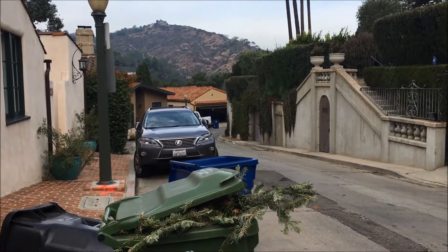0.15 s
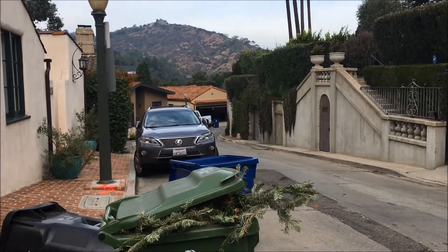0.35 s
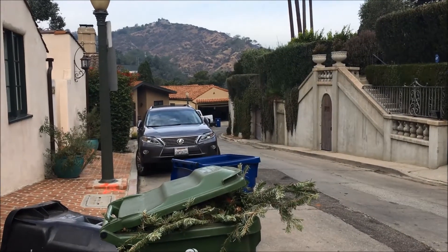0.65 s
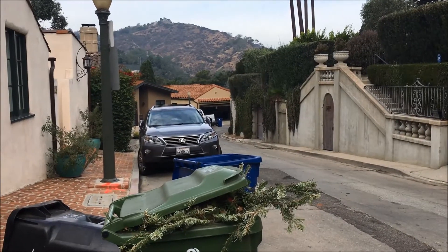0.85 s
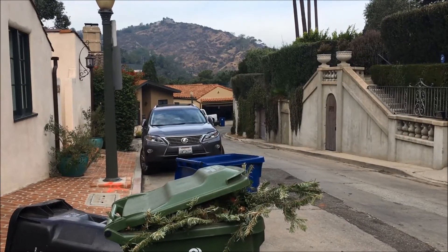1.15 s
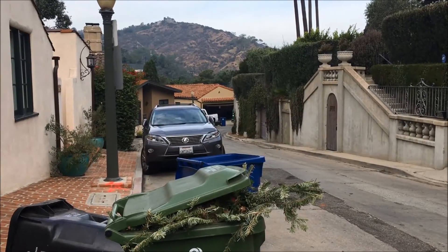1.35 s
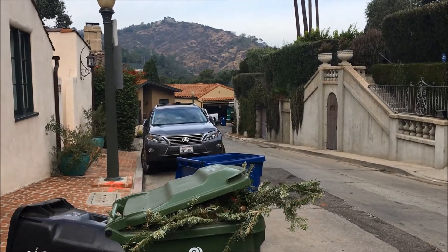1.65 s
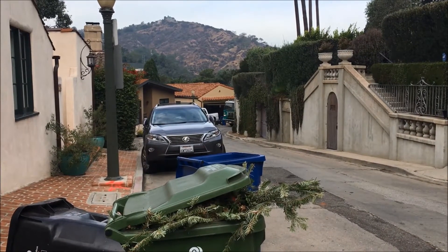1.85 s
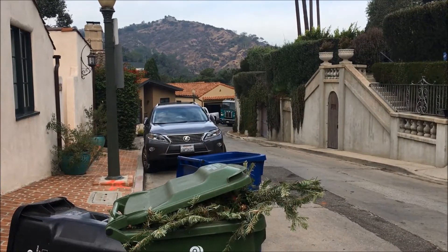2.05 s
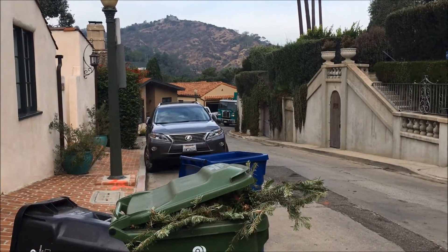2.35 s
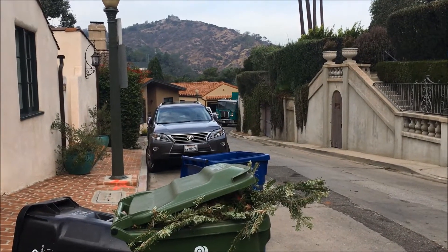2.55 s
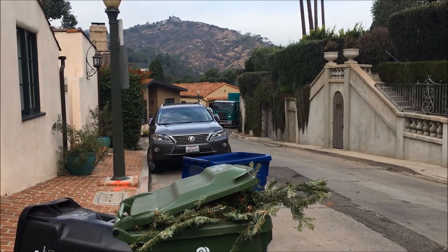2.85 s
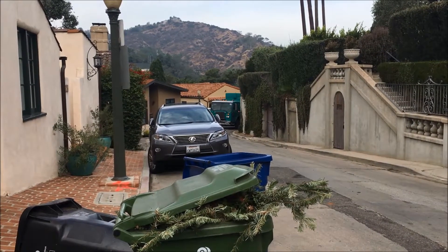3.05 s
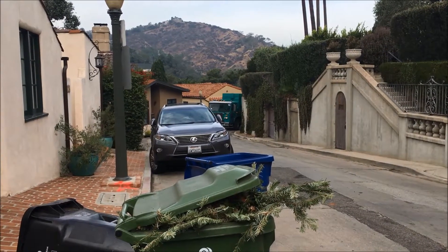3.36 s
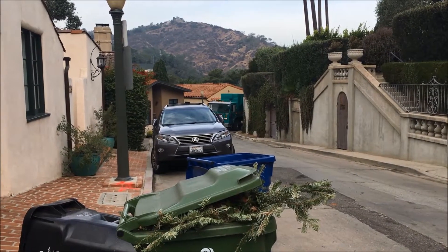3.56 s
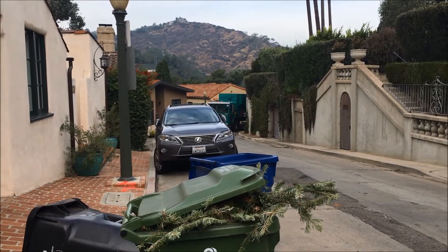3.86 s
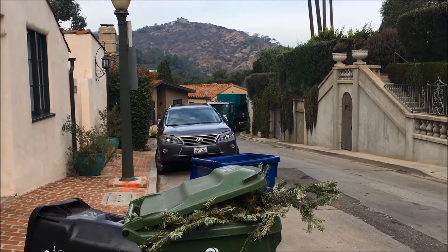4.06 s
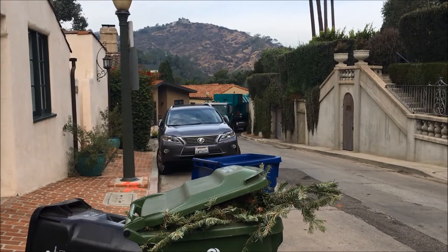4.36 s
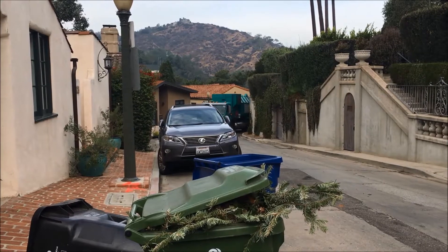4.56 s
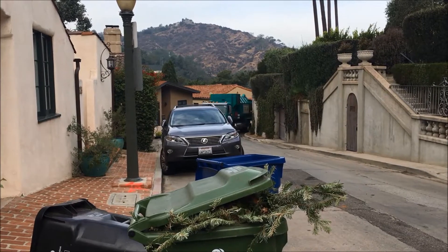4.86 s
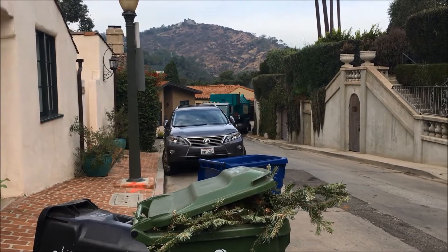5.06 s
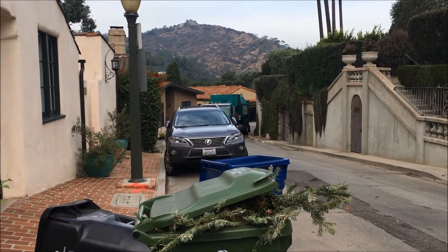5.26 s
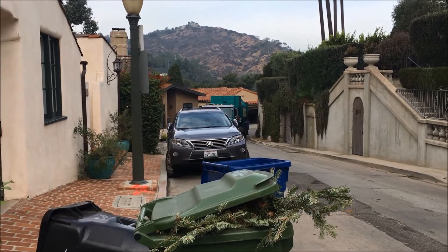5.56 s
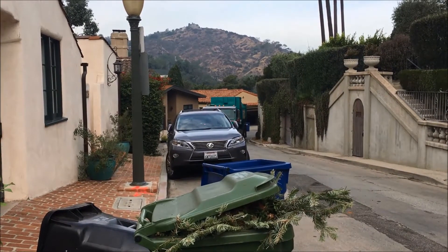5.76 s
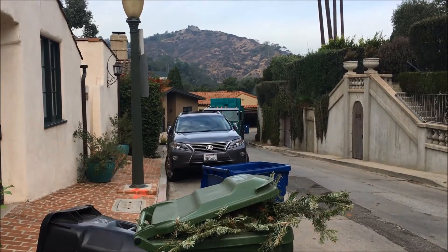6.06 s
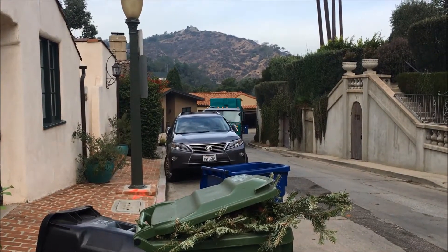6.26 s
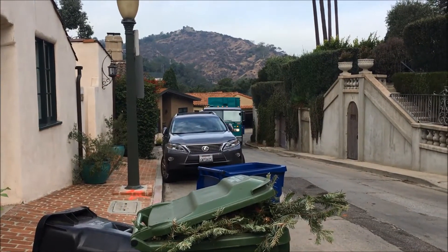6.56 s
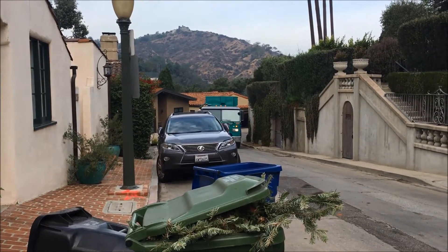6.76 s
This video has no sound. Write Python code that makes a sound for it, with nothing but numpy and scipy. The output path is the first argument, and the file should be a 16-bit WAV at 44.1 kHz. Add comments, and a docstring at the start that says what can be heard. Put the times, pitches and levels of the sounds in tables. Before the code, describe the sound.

Outdoors on a narrow street, a stationary handheld microphone hears a distant heavy truck coming closer. The deep exhaust note swells and fades with wall echoes over soft rumble and whines. Past the middle the engine revs up under load, begins as a rough fast flutter that slows to a heavy throb, and adds thin turbo whistle, drive-line whine, clatter and airy hiss. It ends loud, still approaching.

```python
"""The exhaust of a six-cylinder refuse truck booms at the firing rate and throbs under load, as the truck
speeds up toward the microphone along a walled street. Crank-locked sines make pump, fan, gear and order tones;
free sines make hum, turbo and drive-line whine. Shaped noise makes growl, rattle and a roar that grows louder
and brighter. Two thin squeaks come early, one faint puff of air later."""
import sys
import numpy as np
from scipy import signal
from scipy.fft import rfft, irfft, next_fast_len
from scipy.io import wavfile
from scipy.ndimage import uniform_filter1d, map_coordinates

SR = 44100
rng = np.random.default_rng(int(sys.argv[2]) if len(sys.argv) > 2 else 0)


def file_out(sig):
    """Save sig as 16-bit WAV at sys.argv[1]."""
    # one column per channel
    cols = np.atleast_2d(sig).T
    # limit, then scale
    lim = np.clip(cols, -1, 1)
    pcm = np.round(lim * 32767).astype(np.int16)
    wavfile.write(sys.argv[1], SR, pcm)


N = 304290
TIME_S = np.arange(N) / SR


def amp(db):
    """Gain of a level in dB."""
    return 10 ** (np.asarray(db) / 20)


def unit(x):
    """x scaled to rms 1."""
    return x / np.sqrt(np.mean(x ** 2) + 1e-20)


def curves(rows):
    """One value per sample for each column after the time."""
    knots_s, *columns = np.transpose(rows)
    return [np.interp(TIME_S, knots_s, column) for column in columns]


def wobble(knots_per_s):
    """Smooth random curve through normally distributed knots."""
    knots = rng.standard_normal(int(N * knots_per_s / SR) + 4)
    return map_coordinates(knots, [np.arange(N) * knots_per_s / SR])


def filtered(x, response):
    """x times a response of frequency, N samples long."""
    size = next_fast_len(N + 8192)
    spectrum = rfft(x, size) * response(np.fft.rfftfreq(size, 1 / SR))
    return irfft(spectrum, size)[..., :N]


def coloured(x, spectrum):
    """x shaped by a spectrum, interpolated over log frequency; rms 1."""
    knots_hz, db = np.transpose(spectrum)

    def response(hz):
        return amp(np.interp(np.log(hz + 1), np.log(knots_hz + 1), db, left=-120, right=-120))
    return unit(filtered(x, response))


def rush(spectrum, patchy_db):
    """Coloured noise of rms 1 with time-frequency patches of random gain."""
    bins = signal.stft(rng.standard_normal(N + 512), nperseg=512)[2]
    patches = uniform_filter1d(rng.standard_normal(bins.shape), size=5, axis=0)
    patches = uniform_filter1d(patches, size=16, axis=1)
    noise = signal.istft(bins * amp(patchy_db * unit(patches)), nperseg=512)[1][:N]
    return coloured(noise, spectrum)


def tone(turns, flutter_db, drift_turns, knots_per_s):
    """Sine on a running phase, about rms 1, unsteady in level and phase."""
    level = np.sqrt(2) * amp(flutter_db * wobble(knots_per_s))
    return level * np.sin(2 * np.pi * (turns + drift_turns * wobble(knots_per_s)))


def glide(rows, flutter_db, drift_turns, knots_per_s):
    """Whine with a pitch of its own, silent before its first row."""
    hz, db = curves(rows)
    started = TIME_S > rows[0][0]
    return started * amp(db) * tone(np.cumsum(hz) / SR, flutter_db, drift_turns, knots_per_s)


# engine speed: (time [s], firing rate [Hz])
SPEED = [(0, 59.02), (.8, 62.66), (1.5, 61.06), (1.9, 61.77), (2.8, 65.22), (3.4, 66.25), (4, 65.95),
         (4.2, 67.05), (4.4, 70.87), (4.7, 75.17), (5, 77.85), (5.3, 79.26), (5.6, 80.03), (6, 80.62),
         (6.9, 83.2)]


def crank():
    """Crank turns so far: three firings a turn."""
    return np.cumsum(curves(SPEED)[0]) / (3 * SR)


LOAD_START_S, LOAD_RISE_S = 4.344, 0.75


def load():
    """Engine load, rising from 0 to 1 as the driver opens the throttle."""
    return np.clip((TIME_S - LOAD_START_S) / LOAD_RISE_S, 0, 1)


# nearness of the truck: (time [s], level [dB])
NEAR = [(0, 1), (.3, -0.1), (1.7, 0.1), (3.4, 5.5), (4.4, 6.5), (4.6, 8), (5.7, 9.5), (6.3, 11),
        (6.9, 13.5)]


def nearing(far_db, db_per_near_db):
    """Gain of a layer that grows as the truck nears."""
    return amp(far_db + db_per_near_db * curves(NEAR)[0])


# exhaust boom, swelling and fading as wall echoes add or cancel: (time [s], level [dB])
BOOM = [(0, -28.5), (.65, -27.5), (.82, -37), (1.1, -33.5), (1.5, -25.5), (1.68, -30.5), (1.82, -26.5),
        (2.02, -32), (2.3, -26.5), (2.6, -32.5), (3, -24.5), (3.28, -32), (3.55, -22.5), (4.1, -21.5),
        (4.27, -23.5), (4.37, -30), (4.5, -22.5), (5.05, -15), (5.4, -17.5), (6, -14.5), (6.4, -19.5),
        (6.6, -17), (6.8, -19.5), (6.9, -19.5)]
# throb of the boom, mostly slowing as the drive takes hold: (time [s], throb rate [Hz])
THROB = [(4.4, 57.82), (4.7, 44.95), (5.15, 29.17), (5.5, 23.57), (6.05, 21.66), (6.4, 14.52), (6.6, 17.32),
         (6.9, 13.75)]
# side tones under the boom at full load; the lower one LOAD_RISE_S after the throb starts
SIDE_LOWER_DB, SIDE_UPPER_DB, SIDE_GROWS_DB_PER_S = -11.5, -14, 3
SIDE_LIGHT_DB = -15  # added to the side tones at zero load
SECOND_SIDES_DB = -10.5  # re the lower side tone; sharpens each throb


def exhaust():
    """Firing tone, its level rocked by the throb: side tones below and above."""
    since_s = TIME_S - THROB[0][0]
    started = since_s > 0
    throbs = np.cumsum(started * curves(THROB)[0]) / SR + .39
    throb_phase = 2 * np.pi * throbs
    firing = np.exp(2j * np.pi * (3 * crank() + 0.01 * wobble(8.2)))

    lower_gain = amp(SIDE_LOWER_DB + SIDE_GROWS_DB_PER_S * (since_s - LOAD_RISE_S))
    lower = lower_gain * np.exp(-1j * throb_phase)
    upper = amp(SIDE_UPPER_DB) * np.exp(1j * throb_phase)
    second = lower_gain * amp(SECOND_SIDES_DB) * np.cos(2 * throb_phase)
    sides = amp(SIDE_LIGHT_DB * (1 - load())) * (lower + upper + second)

    level = np.sqrt(2) * amp(curves(BOOM)[0] + 0.23 * wobble(6.4))
    return level * np.real(firing * (1 + started * sides))


# weaker crank orders: [cycles per crank turn]
ORDERS_WEAK = [1.5, 2, 2.5, 4, 4.5, 5, 6, 7.5, 9, 11, 15, 20, 30, 39, 42, 62, 65]
# their levels far off: (at light load [dB], at full load [dB])
ORDERS_DB = [(-57.5, -43.5), (-65, -51), (-49, -48), (-50.5, -53.5), (-51.5, -47.5), (-59.5, -53.5),
             (-51, -59), (-50.5, -56), (-62, -53), (-64, -58), (-58.5, -59), (-57.5, -59.5), (-62.5, -78),
             (-71, -68.5), (-67, -56.5), (-74, -69.5), (-70, -62)]
ORDERS_DB_PER_NEAR_DB = 0.44


def orders():
    """Uneven cylinders add faint tones that fade in and out; the load shifts their balance."""
    turns, full = crank(), load()
    out = np.zeros(N)
    for order, (light_db, full_db) in zip(ORDERS_WEAK, ORDERS_DB):
        far_db = light_db + (full_db - light_db) * full
        level = nearing(far_db, ORDERS_DB_PER_NEAR_DB) * amp(3 * wobble(1.2))
        out += level * tone(order * turns + rng.random(), flutter_db=3,
                            drift_turns=.04 + order / 500, knots_per_s=4 + order / 2)
    return out


# low roar: (time [s], level [dB])
LOW_ROAR = [(0, -48), (.4, -47), (1.3, -45), (1.65, -47.5), (2.6, -47), (3.6, -48.5), (4.6, -45.5),
            (5.5, -45.5), (6.2, -45.5), (6.45, -43), (6.9, -43.5)]


def low_roar_db():
    """Level shared by growl and rumble."""
    return curves(LOW_ROAR)[0]


# growl spectrum before scaling: (frequency [Hz], level [dB])
GROWL = [(90, -44.5), (150, -2), (300, -1.5), (440, -3), (520, -12.5), (700, -11.5), (1100, -15),
         (1400, -43)]


def growl():
    """Noise nearly repeating every four-stroke cycle: faint half-order lines, pattern slowly renewed."""
    steps = 512
    patterns = rng.standard_normal((24, steps))
    age = np.clip(2.212 * TIME_S, 0, len(patterns) - 1)  # patterns used so far
    angle = crank() / 2 % 1 * steps  # two crank turns a cycle
    cyclic = map_coordinates(patterns, [age, angle], order=1, mode="grid-wrap")
    return amp(low_roar_db() + 0.06) * coloured(cyclic, GROWL)


# whines on the shafts: (time [s], pump level [dB], fan level [dB])
WHINES = [(0, -41, -41), (.5, -42, -45), (1.2, -40, -43), (1.5, -39.5, -46), (2.1, -40, -42),
          (2.65, -35, -45), (3, -36, -50), (3.45, -41, -45), (4.15, -40.5, -53), (4.38, -50, -52),
          (4.65, -48, -46), (5.2, -53, -53), (5.6, -44.5, -53), (6.2, -45.5, -51), (6.9, -39, -43)]
# gear mesh whine: (time [s], level [dB])
MESH = [(0, -70), (2.1, -58), (3.7, -62), (4.02, -53), (4.14, -60), (4.25, -50), (4.37, -47), (4.43, -64),
        (4.6, -60), (4.66, -46), (4.82, -52), (4.93, -43), (5.15, -51), (5.42, -45), (5.72, -47),
        (5.78, -61), (6.9, -51)]


def whines():
    """Pump and belt-driven fan lie close together and beat; the gear mesh sings higher up."""
    turns = crank()
    pump_db, fan_db = curves(WHINES)
    pump = amp(pump_db) * tone(10 * turns, flutter_db=1.5, drift_turns=.02, knots_per_s=5)
    fan = amp(fan_db) * tone(10.285 * turns + .1, flutter_db=.8, drift_turns=.02, knots_per_s=5)
    mesh = amp(curves(MESH)[0]) * tone(68 * turns, flutter_db=2.2, drift_turns=.06, knots_per_s=40)
    return pump + fan + mesh


# engine block rattle: (time [s], lower band level [dB], upper band level [dB])
RATTLE = [(0, -64, -78), (2, -53.5, -69), (4.1, -50.5, -60), (4.6, -44, -52), (5.1, -51, -52),
          (5.8, -48.5, -58), (6.3, -46, -47), (6.9, -46.5, -41)]
# block modes, one list per band: (frequency [Hz], width [Hz])
BLOCK = [
    [(1065, 49), (1135, 73)],
    [(1710, 76), (1785, 51)],
]


def rattle():
    """Combustion noise rings the block's modes in uneven bursts."""
    out = np.zeros(N)
    for modes, db in zip(BLOCK, curves(RATTLE)):
        def ring(hz):
            resonances = sum(1j * hz * width / (centre ** 2 - hz ** 2 + 1j * hz * width)
                             for centre, width in modes)
            return resonances ** 2
        bursts = amp(2.2 * wobble(45)) * rng.standard_normal(N)
        out += amp(db) * unit(filtered(bursts, ring))
    return out


# deep rumble of road and chassis: (time [s], level [dB])
GROUND = [(0, -33.5), (1, -39.5), (3.7, -37), (4.3, -34.5), (4.6, -28.5), (5.2, -33), (6.9, -36)]
# roar spectra before scaling: (frequency [Hz], level [dB])
DEEP = [(15, -14), (30, -14.5), (50, 5.5), (100, 1), (140, -5), (180, -22.5), (260, -36)]
RUMBLE = [(100, -32.5), (170, 2), (240, 3), (320, 5), (450, 1), (550, -17), (800, -41)]
BODY = [(280, -18.5), (480, -3.5), (560, -4), (657, -2), (772, -5.5), (880, -1.5), (1070, -2), (1210, -4.5),
        (1360, -6.5), (1780, -3), (3000, -18), (3900, -28.5), (6600, -120)]
HISS = [(1410, -23), (2400, -6), (2940, -5), (3720, -2.5), (4890, -10.5), (6040, -7.5), (7940, -18),
        (9000, -16.5), (10500, -27), (12700, -29), (15600, -37)]


def roar():
    """Deep rumble, low roar, intake noise and hiss; the upper two pulse faintly with each firing."""
    pulse = 1 + 0.027 * np.cos(2 * np.pi * 3 * crank())
    surge = wobble(2.59)
    deep = amp(curves(GROUND)[0] + 1.3 * wobble(3.04)) * rush(DEEP, patchy_db=0.1)
    rumble = amp(low_roar_db() - 1 + 0.76 * wobble(3.8)) * rush(RUMBLE, patchy_db=2.0)
    body_level = nearing(far_db=-46.5, db_per_near_db=0.62) * amp(0.27 * surge)
    body = body_level * pulse * rush(BODY, patchy_db=1.0)
    hiss_level = nearing(far_db=-59.5, db_per_near_db=0.94) * amp(.2 * surge + 0.37 * wobble(3.968))
    hiss = hiss_level * pulse * rush(HISS, patchy_db=0.6)
    return deep + rumble + body + hiss


# faint early hum: (time [s], frequency [Hz], level [dB])
HUM = [(0, 680, -61), (.35, 688, -53.5), (.55, 693, -58), (.75, 700, -90)]


def hum():
    """Faint unsteady sine, rising slightly in pitch, that dies away."""
    return glide(HUM, flutter_db=2.5, drift_turns=.06, knots_per_s=12)


# squeaks: (start [s], length [s], first frequency [Hz], last frequency [Hz], level [dB])
SQUEAKS = [(.04, .11, 5430, 5450, -73), (.435, .115, 5170, 4990, -64)]
OCTAVE_DB = -15  # re the fundamental


def squeaks():
    """Short thin sliding notes, slightly rough in phase, with a weak octave."""
    out = np.zeros(N)
    rough = wobble(100)
    for start_s, length_s, first_hz, last_hz, db in SQUEAKS:
        start, length = int(start_s * SR), int(length_s * SR)
        span = slice(start, start + length)
        u = np.linspace(0, 1, length)
        hz = first_hz + (last_hz - first_hz) * u
        phase = 2 * np.pi * (np.cumsum(hz) / SR + 0.19 * rough[span])
        note = np.sin(phase) + amp(OCTAVE_DB) * np.sin(2 * phase)
        envelope = np.sqrt(np.abs(np.sin(np.pi * u)))
        out[span] += np.sqrt(2) * amp(db) * envelope * note
    return out


# turbo whistle: (time [s], frequency [Hz], level [dB])
TURBO = [(3.9, 6000, -89), (4.5, 6630, -63), (4.8, 7370, -72), (5, 7570, -66.5), (6, 7400, -76.5),
         (6.9, 7520, -71)]


def turbo():
    """High whistle, its phase jittered fast enough to blur the pitch."""
    return glide(TURBO, flutter_db=3.5, drift_turns=0.7, knots_per_s=200)


# drive-line whine: (time [s], frequency [Hz], level [dB])
AXLE = [(4.2, 560, -57), (4.5, 556, -52), (4.85, 556, -52.5), (5.2, 581, -52.5), (6, 620, -51.5),
        (6.9, 633, -53)]


def axle():
    """Drive-line whine on its own pitch curve, following road speed rather than the crank."""
    return glide(AXLE, flutter_db=4, drift_turns=.07, knots_per_s=14)


# air valve: (peak time [s], spread [s], level [dB])
PUFF = (4.455, .025, -72)
# its hiss spectrum before scaling: (frequency [Hz], level [dB])
AIR = [(6000, -42), (8500, -5.5), (10500, 0), (13000, -10), (15700, -24)]


def puff():
    """Short breath of high hiss from an air valve, under a bell-shaped envelope."""
    peak_s, spread_s, db = PUFF
    envelope = np.exp(-.5 * ((TIME_S - peak_s) / spread_s) ** 2)
    return amp(db) * envelope * rush(AIR, patchy_db=0.0)


def scene():
    """Everything the street carries to one microphone."""
    engine = exhaust() + orders() + growl() + whines() + rattle() + turbo()
    return (engine + roar() + hum() + squeaks() + axle() + puff())[None]


BASS_HZ, TOP_HZ = 36.4, 15710


def record(dry):
    """The small microphone loses the deepest bass; nothing is kept above the band limit."""
    longer = np.pad(dry, ((0, 0), (0, 4096)), "reflect", reflect_type="odd")  # no step at the end

    def response(hz):
        return (hz < TOP_HZ) * hz ** 2 / np.sqrt(hz ** 4 + BASS_HZ ** 4)
    return filtered(longer, response)


dry = scene()
out = record(dry)
file_out(out)
```